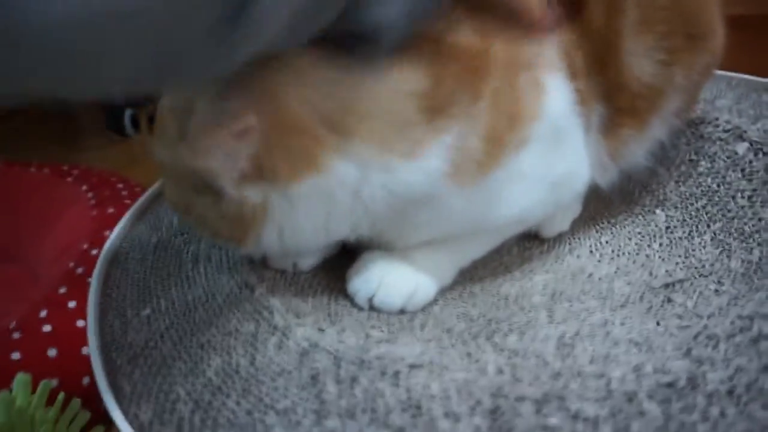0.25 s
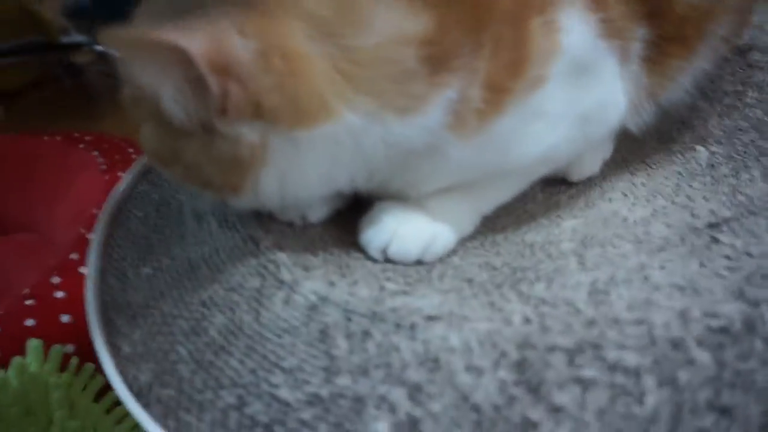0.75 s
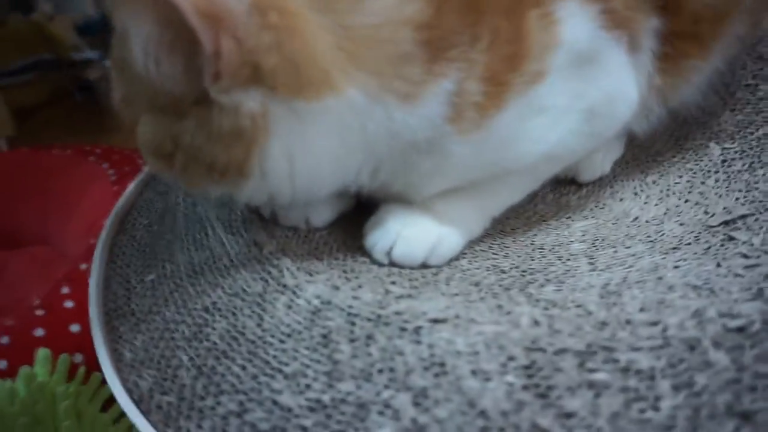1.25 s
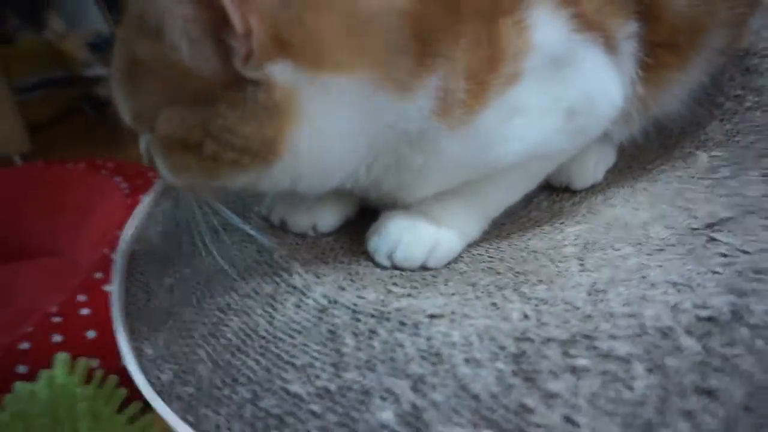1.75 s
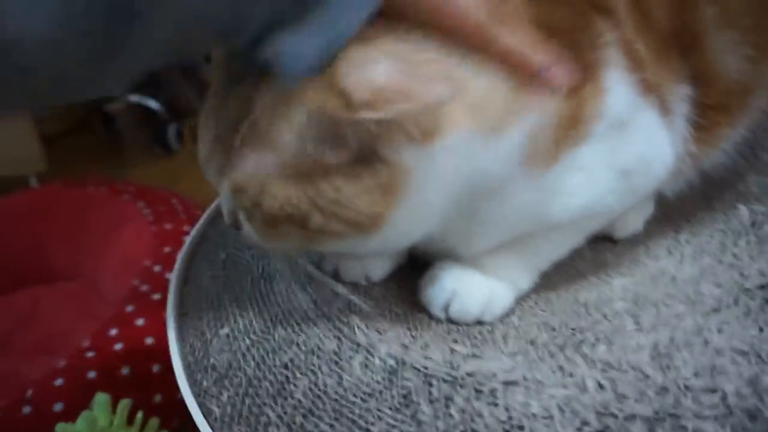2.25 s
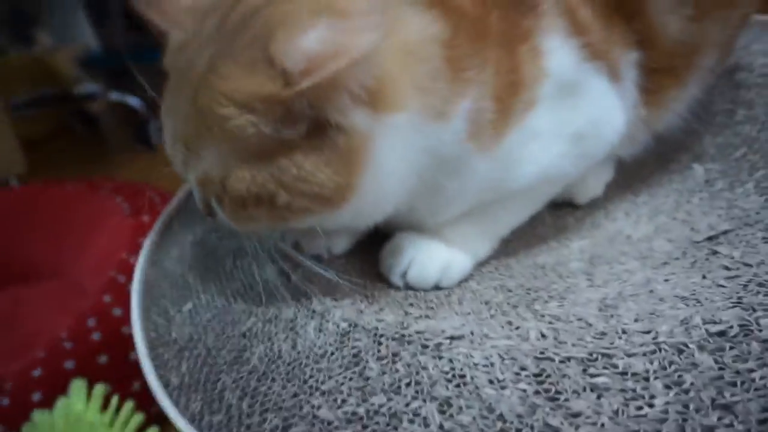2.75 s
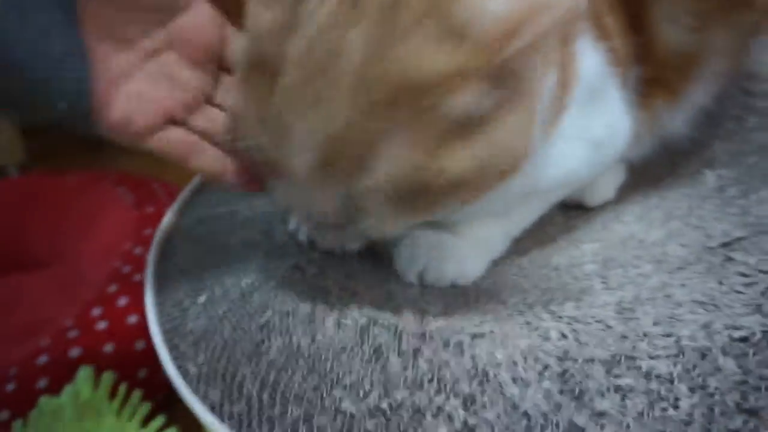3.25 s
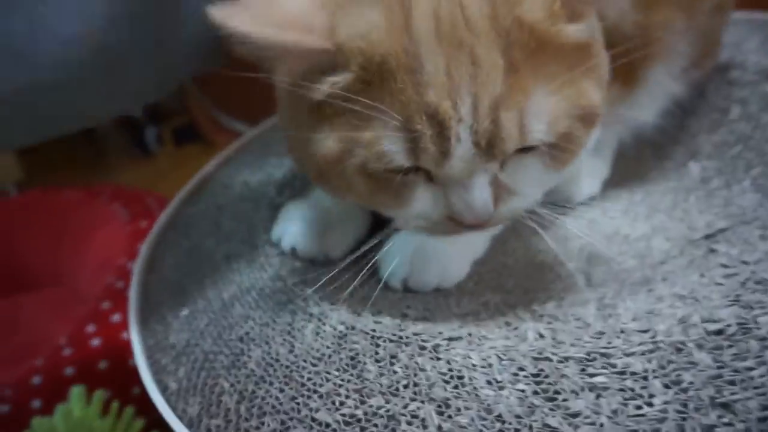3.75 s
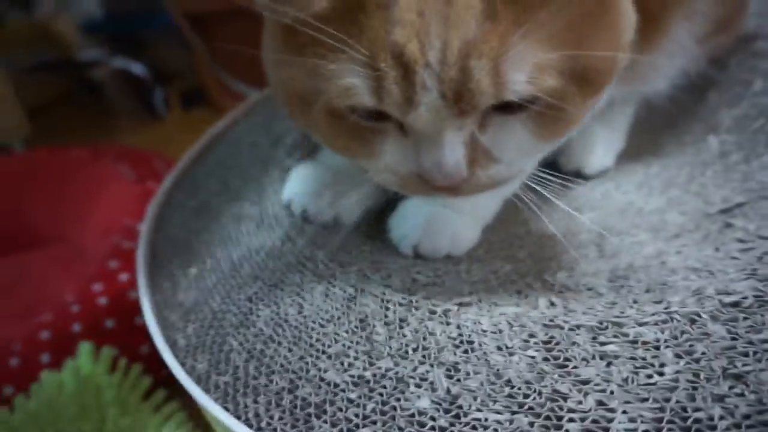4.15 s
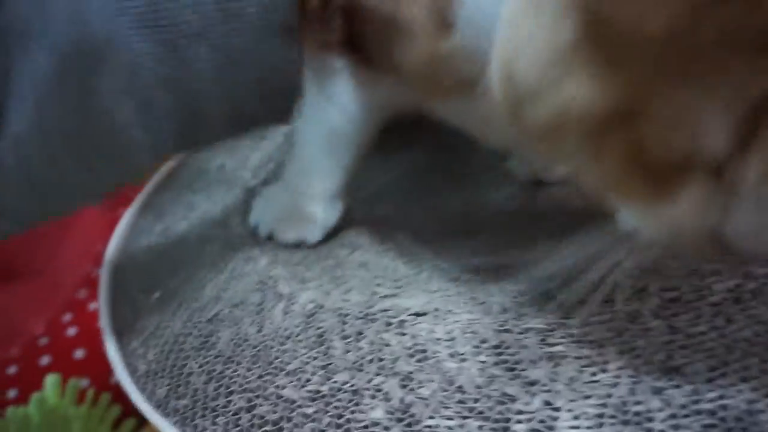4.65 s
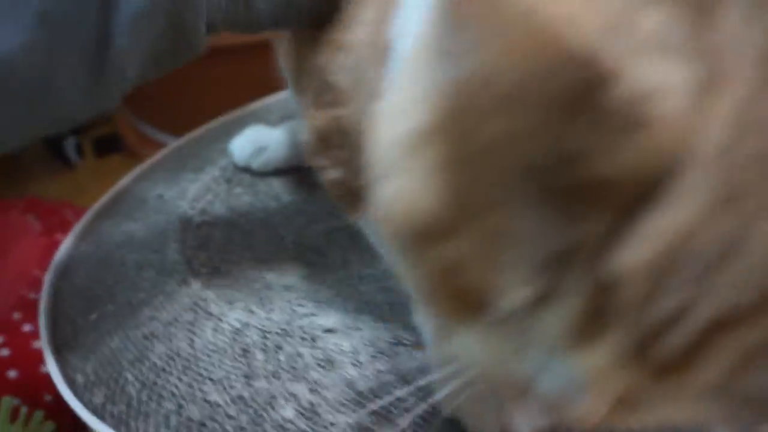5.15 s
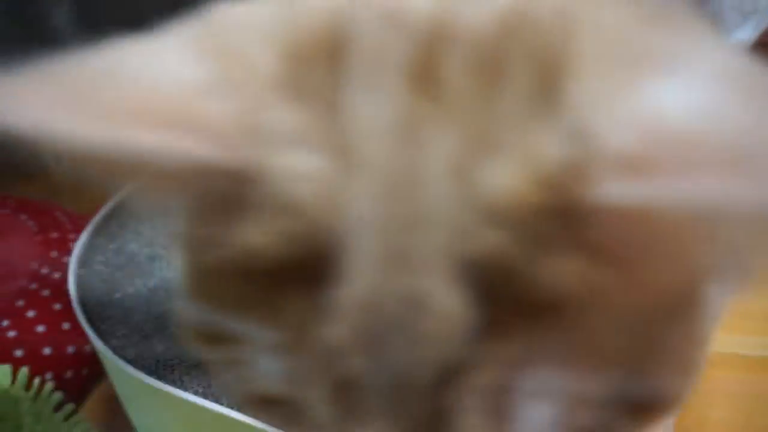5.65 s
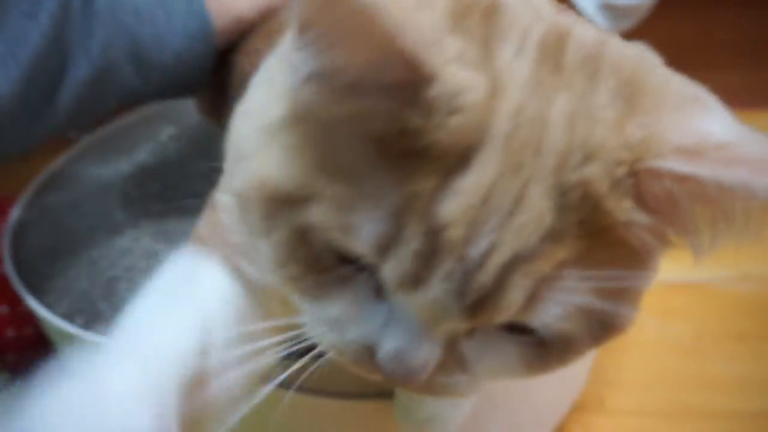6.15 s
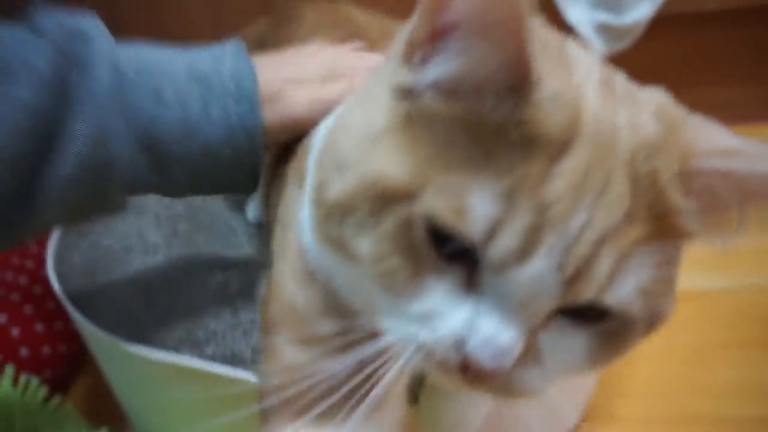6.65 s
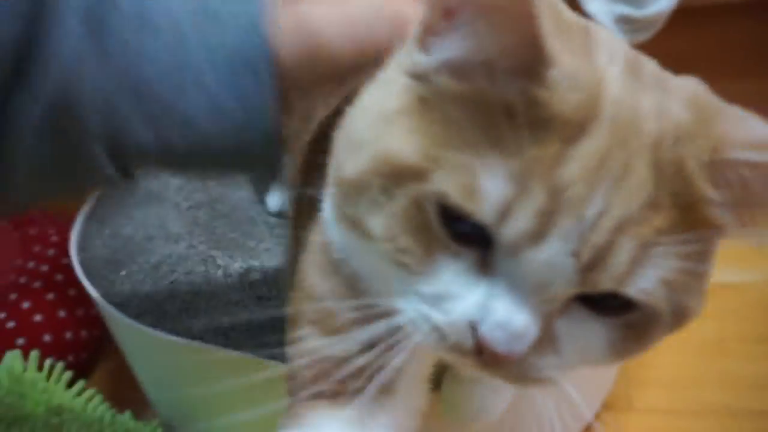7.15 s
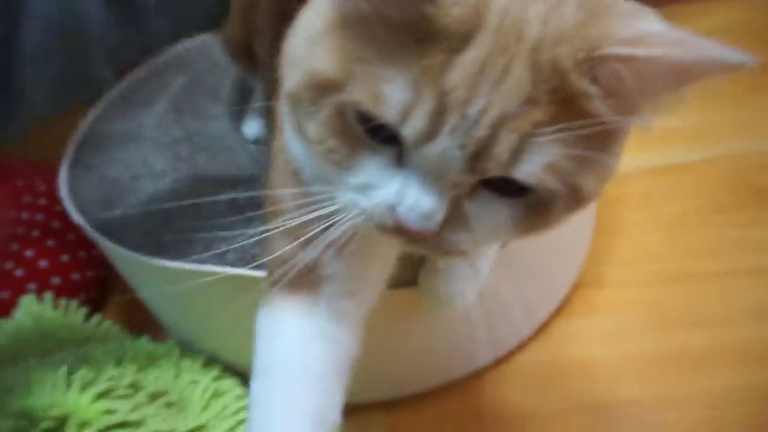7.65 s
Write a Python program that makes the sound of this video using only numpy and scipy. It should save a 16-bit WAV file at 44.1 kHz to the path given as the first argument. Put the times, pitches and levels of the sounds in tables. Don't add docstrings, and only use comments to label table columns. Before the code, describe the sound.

A cat's claws catch and scrape on a corrugated cardboard scratcher in dry, crackly bursts with short pauses, close up in a quiet room.

```python
import sys
import numpy as np
from scipy import signal
from scipy.fft import rfft, irfft
from scipy.io import wavfile
from scipy.ndimage import uniform_filter1d

SR = 44100
rng = np.random.default_rng(int(sys.argv[2]) if len(sys.argv) > 2 else 0)


def master_out(mix):
    frames = np.transpose(np.atleast_2d(mix))
    ceiling = np.clip(frames, -1, 1)
    pcm = np.round(ceiling * 32767).astype(np.int16)
    wavfile.write(sys.argv[1], SR, pcm)


def rack_gain(trim_db):
    fader = np.asarray(trim_db, float)
    return 10 ** (fader / 20)


N = 347949

# (start [s], length [s], peak level [dB], treble re peak [dB],
# share of the length before the peak [1])
DRAGS = [(0.429, 0.044, -40.5, -40, .7), (0.499, 0.082, -32, -23, .5), (0.600, 0.022, -29.5, -32, 1),
         (0.6911, 0.059, -25, -24, 1), (1.170, 0.084, -22.5, -16, .5), (1.295, 0.027, -32.5, -33, 0.26),
         (1.3792, 0.033, -34, -29, 0.25), (1.8367, .021, -39, -26, .9), (1.868, .017, -24.5, -22, .8),
         (1.894, .149, -17, -16.5, 0.13), (3.425, 0.011, -29, -30, 0.62), (3.8475, 0.048, -35.5, -22, 0.55),
         (3.916, 0.011, -26.5, -22.5, 0.78), (4.696, .005, -27, -35, 0.08), (4.918, .011, -20, -16.5, 0.37),
         (4.9525, 0.053, -21.5, -17, 0.19), (5.015, 0.026, -30.5, -21, 0.16),
         (5.0936, 0.055, -26, -22.5, 0.64), (5.538, 0.037, -29, -23.5, 0.74),
         (6.348, 0.028, -34.5, -10, .2), (6.4569, 0.032, -19, -12, 0.55), (6.495, .022, -26, -12, .3),
         (6.589, .055, -29, -11.5, 1), (7.3892, .027, -24.5, -16.5, 0.29), (7.8402, .005, -36, -28, .8)]


def filtered(x, order, hz, kind):
    return signal.sosfilt(signal.butter(order, hz, kind, fs=SR, output="sos"), x)


def ring(x, hz, width_hz):
    return signal.lfilter([1], [1, -np.exp((2j * np.pi * hz - np.pi * width_hz) / SR)], x)


def blows(time_s, gain):
    return np.bincount(np.clip((time_s * SR).astype(int), 0, N - 1), gain, N)


def walk(rate_hz):
    k = int(SR / rate_hz)
    x = uniform_filter1d(uniform_filter1d(rng.standard_normal(N), k), k)
    return x / x.std()


def coloured(points, alike_hz):
    hz = np.maximum(np.fft.rfftfreq(N, 1 / SR), 1)
    point_hz, point_db = np.transpose(points)
    gain = rack_gain(np.interp(np.log(hz), np.log(point_hz), point_db))
    mid, side = rfft(rng.standard_normal((2, N))) * gain
    side = side * np.maximum(hz / np.hypot(hz, alike_hz), .4)
    out = irfft(np.array([mid + side, mid - side]), N)
    return out / out.std()


def room_tone():
    # (frequency [Hz], density [dB per Hz])
    air_colour = [(24, -38), (40, -51), (113, -4), (870, -7), (1330, -9.5), (2980, -9.5), (9980, -20.5),
                  (11500, -18), (15000, -40), (22000, -120)]
    # (frequency [Hz], rms level [dB])
    hum_partials = [(119, -93), (178, -99), (477, -89.5), (2250, -81)]
    t = np.arange(N) / SR
    hum = 0
    for hz, db in hum_partials:
        hum = hum + rack_gain(db + walk(7.5)) * np.sin(2 * np.pi * hz * t + 0.5 * walk(28))
    air_db = -73.5 + 2.1 * walk(20)
    return rack_gain(air_db) * coloured(air_colour, alike_hz=820.0) + hum


def rustle():
    # (time [s], level [dB])
    strength = [(0, -69), (.3, -76.5), (0.998, -72), (1.801, -64.5), (2.1, -59.5), (2.35, -63),
                (2.8, -54.5), (3.1, -68), (3.4, -68.5), (4.098, -78), (4.45, -83), (4.901, -65.5),
                (5.4, -72), (5.702, -67), (6.05, -73), (7.302, -72), (7.5, -68.5), (7.89, -69.5)]
    # (frequency [Hz], density [dB per Hz])
    colour = [(180, -39.5), (300, -14), (508, -6), (730, -6.5), (875, -11), (1420, -3), (1970, -14),
              (3250, -11.5), (3890, -22.5), (11000, -22.5), (14300, -54), (22000, -120)]
    time_s, db = np.transpose(strength)
    grain_db = 1.5 * walk(9) + 1.5 * walk(40) + 2.2 * walk(300)
    brush = coloured(colour, alike_hz=1200.0)
    below_1700 = filtered(brush, 2, 1700, "low")
    below_650 = filtered(brush, 2, 650, "low")
    parts = (below_650, below_1700 - below_650, brush - below_1700)
    patchy = sum(rack_gain(2.6 * walk(7) - .8) * part for part in parts)
    return rack_gain(np.interp(np.arange(N) / SR, time_s, db) + grain_db) * patchy


def swish():
    # (start [s], end [s], resonance [Hz], level [dB])
    strokes = [(2.164, 2.272, 1370, -67), (2.81, 3.126, 976, -64), (2.9, 3.088, 1517, -60),
               (2.5, 2.66, 1350, -60), (2.8, 3.1, 1250, -66), (0.0, 0.095, 507, -78),
               (0.897, 0.943, 210, -77), (1.245, 1.318, 232, -74), (3.222, 3.292, 810, -64.5),
               (3.973, 4.055, 857, -70.5), (3.577, 3.81, 1900, -70.5), (4.825, 4.892, 345, -73),
               (5.123, 5.3, 291, -78), (6.185, 6.36, 494, -68)]
    width_hz = 230.0
    t, out = np.arange(N) / SR, 0
    for start_s, end_s, hz, db in strokes:
        band = ring(ring(rng.standard_normal(N), hz, width_hz), hz, width_hz).imag
        stroke = np.sin(np.pi * np.clip((t - start_s) / (end_s - start_s), 0, 1))
        out = out + rack_gain(db + 2.8 * walk(33)) * np.sqrt(abs(stroke)) * band / band.std()
    return out


def echo(x, far_s=0.3, far_db=-58.0, dull_hz=4770.0):
    t = np.arange(SR // 2) / SR
    near = rack_gain(-33 - 60 * t / .035)
    far = rack_gain(far_db - 60 * t / far_s)
    tail = (near + far) * rng.standard_normal((2, len(t)))
    return signal.fftconvolve(x, filtered(tail, 2, dull_hz, "low"), axes=1)[:, :N]


def linger():
    # (time [s], level [dB], frequency [Hz], width [Hz])
    walls = [(0.323, -56, 2500, 21), (4.309, -56, 2500, 21), (4.667, -54, 2600, 25), (5.445, -56, 2400, 21),
             (6.708, -44, 2620, 18), (6.885, -56, 950, 30), (6.915, -50, 2620, 21), (6.945, -55, 915, 25),
             (5.1103, -41, 1100, 70), (0.004, -50, 2600, 21), (7.418, -46, 2620, 25)]
    out = np.zeros(N)
    for time_s, db, hz, width_hz in walls:
        out += ring(blows(np.array([time_s]), rack_gain([db])), hz, max(width_hz, 5)).imag
    return out


def knocks(cycles=1.74, push_db=8.5, lower_db=-10, lower_ratio=0.69, body_db=-4.5):
    # (time [s], peak level [dB], frequency [Hz])
    contacts = [(0.8252, -50.5, 910), (1.638, -39.5, 1190), (1.6855, -49, 1190), (1.7096, -40, 920),
                (2.0915, -48, 1160), (2.4223, -33.5, 860), (2.5323, -41.5, 965), (2.5616, -38, 1080),
                (2.8104, -37.5, 1110), (3.312, -39, 1230), (4.7006, -47, 596), (4.722, -50, 973),
                (4.7669, -46.5, 830), (4.7961, -49.5, 860), (4.9214, -48.5, 845), (5.0232, -50, 960),
                (5.1103, -40, 1140), (5.3314, -58, 520), (6.2215, -46.5, 930), (6.359, -47, 1200),
                (6.401, -45, 670), (6.7677, -39, 1100), (6.8846, -48.5, 994), (6.9154, -40, 1098),
                (7.1241, -43, 1160), (7.4545, -36, 1160), (7.5378, -47, 450), (7.5365, -47, 760),
                (7.6058, -49.5, 865), (7.8505, -49, 694)]
    out = np.zeros(N + 2000)
    t = np.arange(2000) / SR
    for time_s, db, hz in contacts:
        age = t * hz / cycles * 2
        partner = np.sin(2 * np.pi * lower_ratio * hz * t + 1.5)
        tone = np.sin(2 * np.pi * hz * t) + rack_gain(lower_db) * partner
        thud = ring(rng.standard_normal(len(t)), 1.2 * hz, 1.2 * hz).imag
        thud = rack_gain(body_db) * age * np.exp(-age / 2) * thud / thud.std() / 4
        i = int(time_s * SR)
        out[i:i + len(t)] += rack_gain(db + push_db) * (age * np.exp(-age) * tone + thud)
    return filtered(out[:N], 3, 260, "high")


def taps(width_hz=300.0, crack_s=0.0022, crack_db=-2.0, rise_s=0.000047):
    # (time [s], peak level [dB], ring [Hz])
    touches = [(0.2774, -40.5, 2430), (1.687, -43, 2204), (1.7204, -27.5, 1920), (2.0893, -27.5, 1336),
               (2.1, -32, 1430), (2.524, -36, 2670), (2.5317, -33.5, 2120), (2.539, -31, 1390),
               (2.5585, -29, 1420), (3.0352, -37, 1890), (3.1713, -38.5, 2770), (4.7, -30.5, 2400),
               (6.8074, -43, 2960), (6.9656, -47, 2650), (4.2428, -49, 2640), (5.731, -28, 2370),
               (6.22, -43, 2320), (0.786, -44, 2900), (3.8157, -42, 2630), (5.3138, -50, 2500),
               (5.3298, -47, 2260), (6.3335, -44, 2300), (6.79, -50, 2350), (6.7678, -28, 2860),
               (6.884, -38.5, 2720), (6.9448, -39.5, 2840), (7.128, -29, 2580), (7.4351, -37, 2530),
               (7.451, -34, 2840), (7.4553, -16, 2570), (7.467, -39, 2550), (7.5, -34, 2900),
               (7.5407, -39.5, 1160), (7.8544, -41, 2580)]
    out = np.zeros((2, N + 1000))
    t = np.arange(1000) / SR
    cracks = np.exp(-t / crack_s) * rng.standard_normal((len(touches), 2, len(t)))
    cracks = filtered(cracks, 1, [1300, 4200], "band")
    for (time_s, db, hz), crack in zip(touches, cracks):
        side_rad = np.array([[0], [hz / 1600]])
        tone = np.exp(-np.pi * width_hz * t) * np.sin(2 * np.pi * hz * t + side_rad)
        rise = 1 - np.exp(-t / rise_s)
        i = int(time_s * SR)
        out[:, i:i + len(t)] += rack_gain(db) * rise * (tone + rack_gain(crack_db) * crack)
    return filtered(out[:, :N], 3, 650, "high")


def crackle(count=45, least_db=-59, scatter_db=2.5):
    luck = rng.random((2, count))
    return np.c_[luck[0] * N / SR, least_db - scatter_db * np.log(luck[1])]


def rasp(rasp_db=-35, grain_db=6, edge_s=.008, ends_db=-9):
    t, press = np.arange(N) / SR, np.zeros(N)
    for start_s, length_s, db, _, rise in DRAGS:
        off_peak = np.clip((t - start_s) / length_s - rise, -1, 1)
        inside_s = np.minimum(t - start_s, start_s + length_s - t)
        edge = np.clip(inside_s / edge_s + 1, 0, 2) ** 2 / 4
        press += rack_gain(db + ends_db * off_peak ** 2) * edge
    return press * rack_gain(rasp_db + grain_db * walk(700)) * rng.standard_normal(N)


def drags(slip_db=.8, treble_offset_db=1.5, treble_scatter_db=2.5):
    # (time [s], peak level
    # [dB])
    drag_slips = [
        (0.0055, -25),
        (0.009, -26),
        (0.013, -29),
        (1.8972, -20),
        (1.917, -19),
        (1.9545, -22),
        (1.2272, -24),
        (6.5095, -28),
        (6.4618, -29),
        (6.4775, -29),
                  (0.4282, -46.1), (0.4311, -53.4), (0.4355, -46.9), (0.4424, -47.9), (0.4506, -47.3),
             (0.4537, -42.5), (0.4602, -45.9), (0.4636, -44.1), (0.4678, -54.4), (0.4705, -52.2),
             (0.4777, -59.8), (0.4985, -44.9), (0.5094, -38.7), (0.5129, -37.0), (0.5154, -41.5),
             (0.5189, -37.8), (0.5219, -36.4), (0.5283, -36.0), (0.5342, -29.5), (0.5417, -27.3),
             (0.5473, -35.2), (0.5522, -36.2), (0.5605, -38.1), (0.5632, -33.7), (0.5704, -37.9),
             (0.5787, -38.6), (0.6007, -34.5), (0.6066, -45.8), (0.6108, -48.8), (0.6142, -33.6),
             (0.6187, -30.9), (0.6223, -41.7), (0.6248, -44.4), (0.6929, -37.0), (0.6974, -31.9),
             (0.7023, -27.9), (0.7162, -24.5), (0.7239, -28.4), (0.7323, -29.9), (0.7381, -26.7),
             (0.7417, -27.1), (0.7451, -28.8), (0.7488, -25.9),
                  (1.169, -35.5), (1.1725, -26.7), (1.1761, -33.4), (1.1825, -29.6), (1.1853, -38.0),
             (1.1884, -23.4), (1.1926, -21.7), (1.203, -22.5), (1.2089, -25.9), (1.212, -26.4),
             (1.217, -27.3), (1.2236, -28.8), (1.2294, -23.3), (1.2329, -24.8), (1.2371, -22.5),
             (1.2423, -23.4), (1.2455, -27.0), (1.253, -35.2), (1.2562, -37.4), (1.2941, -46.3),
             (1.3004, -38.7), (1.3056, -33.6), (1.3076, -42.5), (1.3135, -37.3), (1.3169, -45.3),
             (1.3202, -40.9), (1.3228, -42.0), (1.3833, -36.4), (1.3877, -44.6), (1.3922, -32.8),
             (1.3966, -33.5), (1.4029, -40.2), (1.4119, -40.8), (1.833, -42), (1.853, -40), (3.4205, -45.4),
             (3.4255, -39.8), (3.43, -33.1), (3.4344, -32.2), (3.438, -31.1), (3.8463, -29.6),
             (3.8508, -38.5), (3.8585, -39.3), (3.865, -39.9), (3.8702, -41.2), (3.8749, -33.6),
             (3.8787, -33.4), (3.8826, -36.3), (3.8874, -33.6), (3.8982, -41.5), (3.9151, -37.2),
             (3.9195, -32.3), (3.9235, -27.4), (3.9287, -39.0), (4.3122, -27), (4.3158, -27), (4.693, -33),
             (4.697, -33),
                  (1.8695, -31.8), (1.8735, -36.1), (1.8766, -38.2), (1.8793, -34.4), (1.8848, -29.8),
            (1.8876, -37.1), (1.8946, -32.4), (1.8996, -21.1), (1.9027, -20.8), (1.9088, -16.9),
            (1.9135, -17.8), (1.9206, -15.8), (1.9231, -20.8), (1.9278, -19.6), (1.9309, -18.3),
            (1.9338, -18.1), (1.9372, -17.6), (1.9409, -21.5), (1.946, -19.4), (1.9576, -21.7),
            (1.9603, -21.9), (1.9637, -25.6), (1.9692, -19.7), (1.9738, -21.3), (1.9768, -28.4),
            (1.9845, -22.7), (1.9884, -21.6), (1.9947, -23.4), (1.9971, -28.7), (2.0, -19.1),
            (2.0066, -19.7), (2.0113, -24.5), (2.0183, -22.7), (2.0254, -31.2), (2.0283, -31.2),
            (2.0312, -29.0), (2.0363, -33.8), (2.0455, -31.5),
                  (4.9203, -26.9), (4.9245, -34.8), (4.9275, -30.3), (4.9315, -26.6), (4.9521, -23.4),
              (4.9556, -24.0), (4.961, -21.0), (4.9648, -22.7), (4.9688, -23.3), (4.9723, -22.0),
              (4.9768, -23.1), (4.9814, -22.8), (4.9847, -21.3), (4.9885, -28.7), (4.9921, -31.0),
              (4.995, -27.1), (4.9977, -34.3), (5.0018, -28.9), (5.0173, -36.2), (5.0227, -34.4),
              (5.0266, -37.4), (5.0309, -45.9), (5.0393, -34.9), (5.0955, -40.6), (5.0986, -31.7),
              (5.1015, -35.4), (5.1053, -34.3), (5.1099, -27.6), (5.1126, -28.4), (5.1191, -26.6),
              (5.1283, -27.2), (5.1318, -29.6), (5.1361, -24.4), (5.1427, -30.0), (5.1508, -34.5),
              (5.5406, -41.0), (5.5463, -36.3), (5.5494, -36.9), (5.5549, -33.3), (5.559, -36.5),
              (5.5647, -34.3), (5.5675, -43.4), (5.5703, -30.9), (5.5731, -38.5),
                  (6.3532, -49.5), (6.3565, -33.6), (6.3606, -43.1), (6.3735, -41.4), (6.4587, -29.3),
            (6.4653, -26.5), (6.4696, -25.2), (6.4742, -25.0), (6.4812, -29.9), (6.4854, -28.6),
            (6.4952, -26.3), (6.5012, -24.6), (6.5065, -27.5), (6.5157, -33.3), (6.5751, -37.3),
            (6.5787, -28.0), (6.5898, -36.9), (6.5965, -38.7), (6.6007, -37.3), (6.6069, -36.4),
            (6.6164, -34.5), (6.6193, -38.5), (6.6257, -27.7), (6.63, -31.2), (6.6364, -25.5),
            (6.6407, -32.1), (6.6455, -29.8), (7.3892, -25.1), (7.395, -30.9), (7.4016, -30.0),
            (7.4044, -29.0), (7.4068, -27.1), (7.4107, -24.6), (7.8402, -32), (7.8452, -33)]
    time_s, db = np.array(drag_slips).T
    start_s, length_s, _, treble_db, _ = np.transpose(DRAGS)
    outside_s = abs(time_s[:, None] - start_s - length_s / 2) - length_s / 2
    own = np.argmin(outside_s, axis=1)
    scatter_db = treble_scatter_db * rng.standard_normal(len(time_s))
    return np.c_[time_s, db + slip_db, treble_db[own] + treble_offset_db + scatter_db]


def chatter(rows, reach_s=.0095, drop_db=-6.0, pause_s=0.026, creep_db=-50):
    rows = rows[np.argsort(rows[:, 0])]
    time_s, db, treble_db = rows.T
    luck = rng.random((4, len(rows)))
    gap_s = np.diff(time_s, append=N)
    step_db = db + drop_db - 6 * luck[1]
    steps = np.c_[time_s + gap_s * (.35 + .4 * luck[0]), step_db, treble_db]
    pause = (gap_s >= reach_s) & (gap_s < pause_s)
    out = [rows, steps[gap_s < reach_s]]
    for half in (0, 1):
        creep_s = time_s + gap_s * (half + luck[2 + half]) / 2
        out.append(np.c_[creep_s, np.minimum(step_db, creep_db), treble_db][pause])
    return np.vstack(out)


def stutter(time_s, least_s=.0005, spread_s=.0014, drop_db=-7, spread_db=5):
    luck = rng.random((2, len(time_s)))
    return time_s + least_s + spread_s * luck[0], drop_db - spread_db * luck[1]


def slips():
    # (time [s], peak level [dB])
    faint = [(0.412, -35.5), (0.6539, -35), (1.6197, -41), (0.869, -36.5), (1.551, -35.5), (1.5844, -29.5),
             (1.157, -37), (2.5901, -35), (2.6205, -32), (2.9678, -39), (3.1142, -43.5), (3.1653, -41.5),
             (3.2496, -38.5), (3.3114, -38), (3.3987, -30.5), (3.564, -30), (4.004, -43), (4.3433, -41),
             (4.768, -36), (4.7972, -31), (6.541, -34.5), (6.7531, -40), (7.057, -39), (7.087, -39),
             (7.1316, -37), (3.2345, -36), (3.6162, -45), (3.3583, -49), (3.0859, -49), (4.2717, -52),
             (1.4731, -50), (1.0365, -52), (1.054, -51), (3.262, -44), (2.6385, -29), (2.642, -28),
             (2.6, -40), (4.185, -42), (3.009, -45), (7.0254, -55)]
    # (time [s], peak level [dB], treble re peak [dB])
    catches = [(0.0024, -17.5, -14), (0.3226, -17.5, -11), (0.7091, -24.5, -36), (0.8065, -22.5, -26),
               (0.9897, -23.5, -20), (1.5151, -27, -27), (1.7086, -21.5, -45), (2.5622, -17.5, -11.5),
               (2.6463, -19, -38), (2.873, -25.5, -21), (3.2034, -15, -8.5), (3.3251, -20.5, -15.5),
               (3.8368, -16.5, -10), (4.1482, -25.5, -23.5), (4.3085, -18.5, -11), (4.3244, -24.5, -13.5),
               (4.5027, -21.5, -16), (4.5332, -24.5, -15.5), (4.5578, -24, -22.5), (4.6668, -17.5, -13),
               (4.9469, -17.5, -15), (5.4454, -17.5, -15.5), (6.3808, -19.5, -15), (7.38, -18.5, -8),
               (7.4173, -20, -14)]
    # (time [s], peak level [dB], treble re peak [dB])
    tears = [(2.68, -11.5, -18), (2.69, -19.5, -8), (2.6928, -14, -20), (2.7046, -13, -16),
             (2.7286, -12.5, -28.5), (2.7425, -13, -9.5), (2.7525, -15.5, -8), (2.7618, -20.5, -7),
             (2.7686, -14, -7), (2.7795, -17.5, -8), (2.7863, -20.5, -15), (2.7935, -18, -11),
             (2.8008, -23.5, -9), (2.8102, -20.5, -20), (3.454, -14.5, -34.5), (3.4647, -18, -19.5),
             (3.4765, -20.5, -21), (3.4851, -20.5, -19), (3.511, -15, -11.5), (3.5233, -15, -14),
             (3.5435, -13.5, -12.5), (3.5548, -21, -16.5), (6.4506, -14, -9), (6.5703, -17, -7.5),
             (6.5821, -20.5, -10), (6.6619, -26.5, -17), (6.6729, -23.5, -16), (6.687, -18, -17),
             (6.6939, -15, -15.5), (6.7067, -12.5, -13)]
    # (time [s], peak level [dB], treble re peak [dB], deep modes [dB])
    rim = [(2.4212, -15, -15.5, -9), (2.4238, -21, -20, -6), (6.3963, -18, -10, -9), (6.4, -18, -10, -9),
           (6.4054, -26, -10, -8), (6.9146, -13, -23, -5), (7.1150, -23, -20, -6), (6.762, -33, -16, -6),
           (7.5341, -38, -20, -8), (7.605, -38, -20, -7), (7.8032, -39, -18, -8), (4.1914, -31, -22, -4),
           (0.8248, -30, -22, -5), (1.6389, -27, -29, -6)]
    faint = np.vstack([faint, crackle()])
    faint_treble_db = .15 * faint[:, 1] - 21
    loose = chatter(np.vstack([catches, tears, np.c_[faint, faint_treble_db]]))
    rows = np.vstack([loose, drags()])
    return np.vstack([rim, np.c_[rows, np.zeros(len(rows))]])


def claws(dulling=1.0, grit_s=0.00083, grit_db=-12.5, shell_db=0.9):
    # (frequency [Hz], width [Hz], left level [dB], right level [dB])
    shell = [(1407, 182, -20.5, -15), (1737, 212, -5.5, -10.5), (2080, 220, -2.92, -6.5),
             (2564, 104, -5, -8.5), (3093, 306, -1, -2.5), (3564, 219, -16, -7), (4290, 620, -0.5, -11.5),
             (4602, 218, -7, -35), (5260, 390, -14.5, -12)]
    # (frequency [Hz], width [Hz], left level [dB], right level [dB])
    grit = [(6200, 305, -15, 0.5), (7160, 650, -8, -6.5), (7960, 300, -4, -4.5), (9390, 616, 0.5, 1.5),
            (10260, 495, 0.5, -16.5), (11440, 510, -15.5, 0.5)]
    # (frequency [Hz], left lead [rad])
    ports = [(0, 0), (1290, 0.4), (2240, -0.7), (2670, 3.8), (3270, 2.2), (3880, -4.5), (4390, 1.3),
             (5080, 3.4), (5770, 3.8), (6290, -1.0), (9470, -0.0), (10500, -1.2), (11000, 0.5),
             (11900, -0.1)]
    rim_share = [-.3, 1, 1, -.6, 0, .4, .3, .3, 0]
    time_s, db, treble_db, deep_db = slips().T
    late_s, late_db = stutter(time_s)
    creak_s = 3 * time_s - 2 * late_s
    out, fibres = np.zeros((2, N)), rasp()
    for k, (hz, width_hz, left_db, right_db) in enumerate(shell):
        dull_db = dulling * (treble_db + 7.5) * max(np.log2(hz / 3200), 0) + deep_db * rim_share[k]
        kick_db = db + shell_db + dull_db + 1.9 * rng.standard_normal(len(time_s))
        kick = blows(time_s, rack_gain(kick_db)) + blows(late_s, rack_gain(kick_db + late_db))
        kick += blows(creak_s, rack_gain(kick_db - 24)) + fibres * min(3200 / hz, 1)
        z = (-1) ** k * ring(kick, hz, width_hz)
        lag = np.exp(-1j * np.interp(hz, *np.transpose(ports)))
        out += [rack_gain(left_db) * z.imag, rack_gain(right_db) * (z * lag).imag]
    bursts = blows(time_s, rack_gain(db + treble_db + grit_db))
    release = signal.lfilter([1], [1, -np.exp(-1 / (grit_s * SR))], bursts)
    release = release * rng.standard_normal(N) + rack_gain(-28) * fibres
    for k, (hz, width_hz, left_db, right_db) in enumerate(grit):
        out += (-1) ** k * rack_gain([[left_db], [right_db]]) * ring(release, hz, width_hz).imag
    return filtered(out, 4, 1150, "high")


def scene():
    hits = claws() + taps() + knocks() + linger()
    return hits + echo(hits) + rustle() + swish() + room_tone()


def band_limit(x):
    return signal.sosfilt(signal.butter(12, 12340, fs=SR, output="sos"), x)


def record(dry):
    top = signal.cheby1(14, .5, 10950, fs=SR, output="sos")
    bass = signal.butter(1, 90, "high", fs=SR, output="sos")
    x = signal.sosfilt(np.vstack([top, bass]), dry)
    x = np.tanh(1.2 * x) / 1.2
    return band_limit(x - 0.0082 * x ** 2)


dry = scene()
out = record(dry)
master_out(out)
```